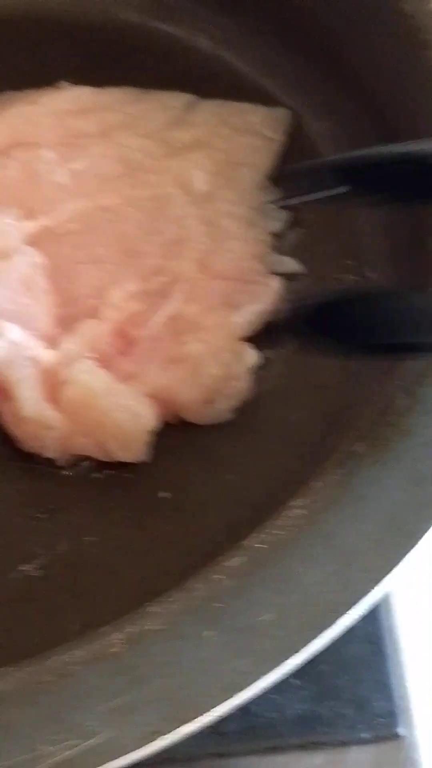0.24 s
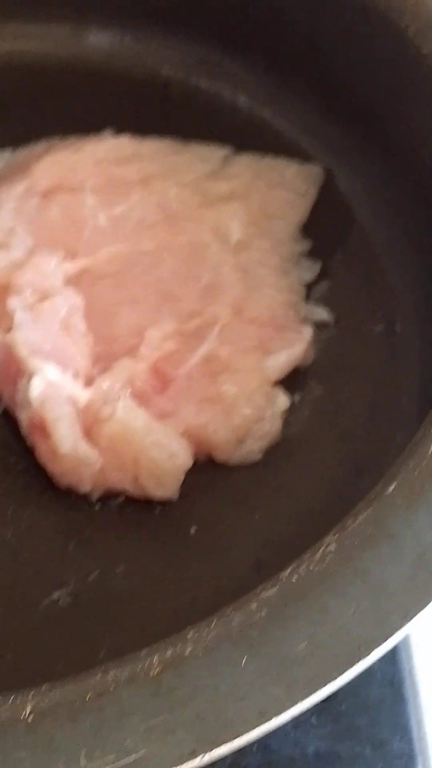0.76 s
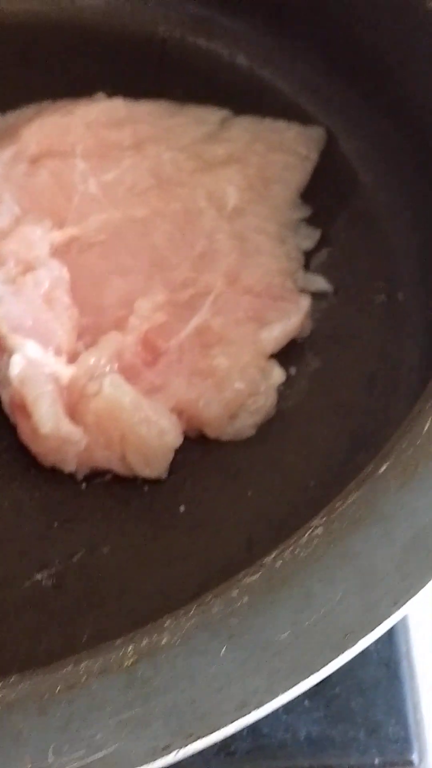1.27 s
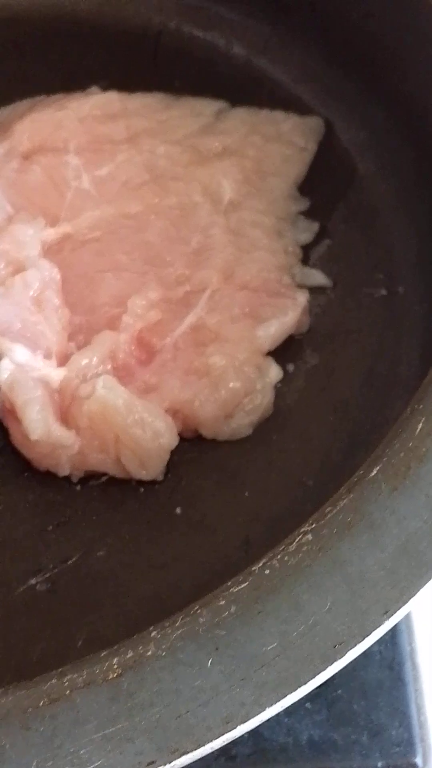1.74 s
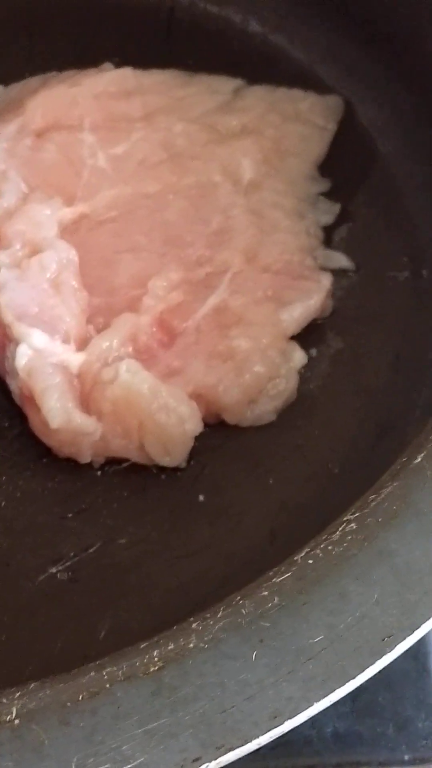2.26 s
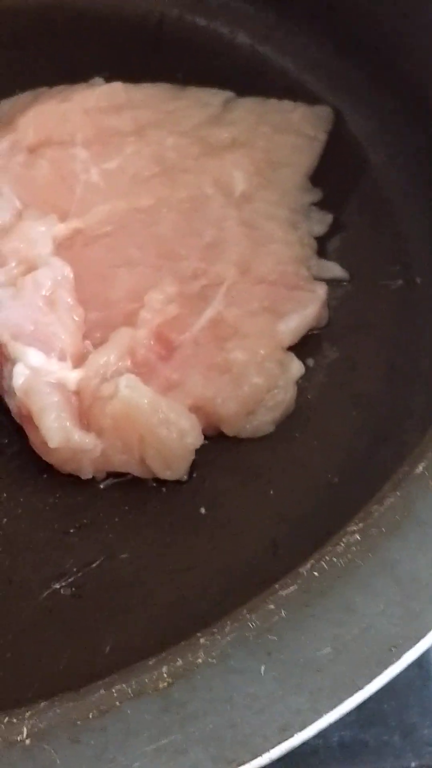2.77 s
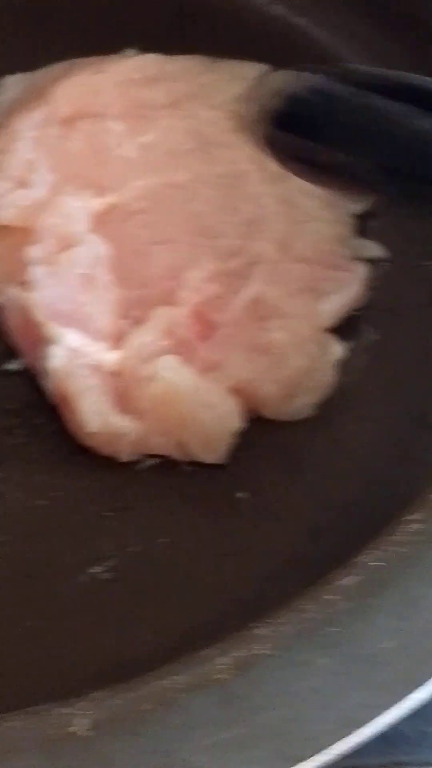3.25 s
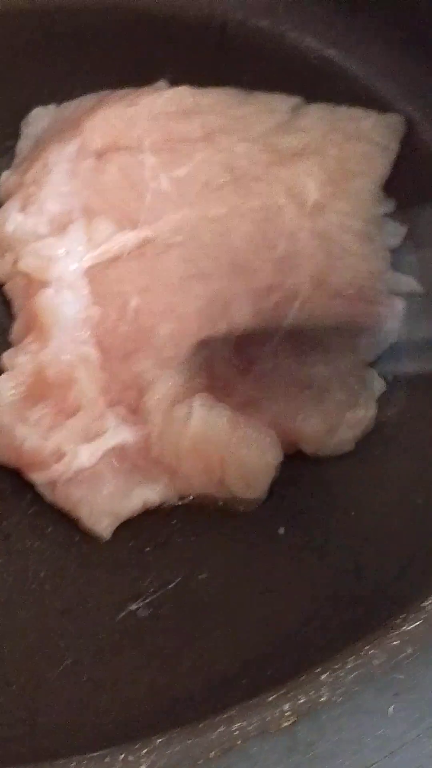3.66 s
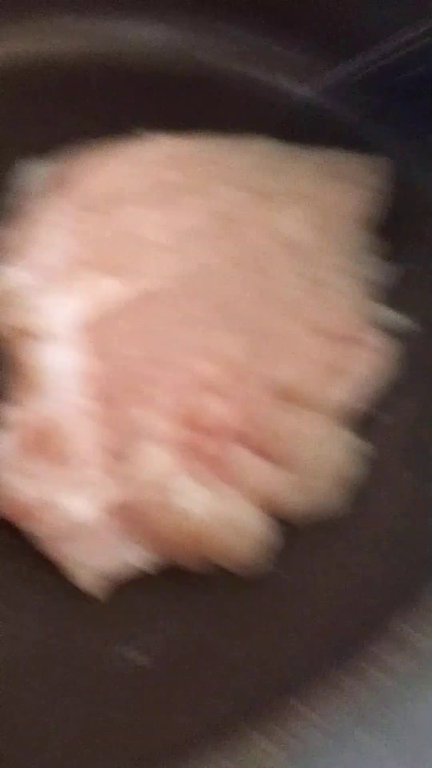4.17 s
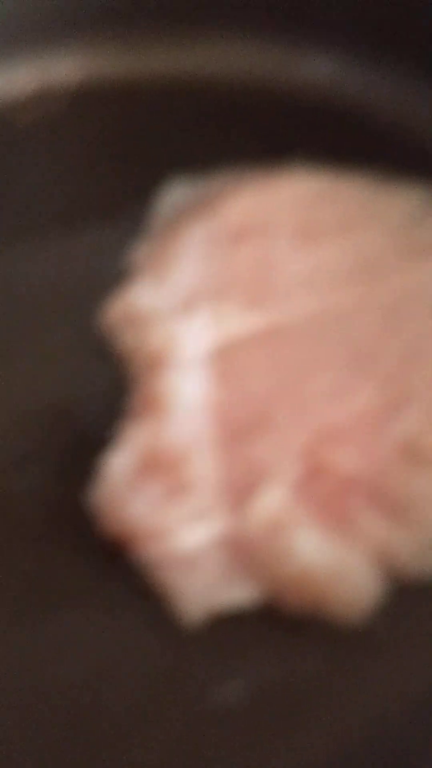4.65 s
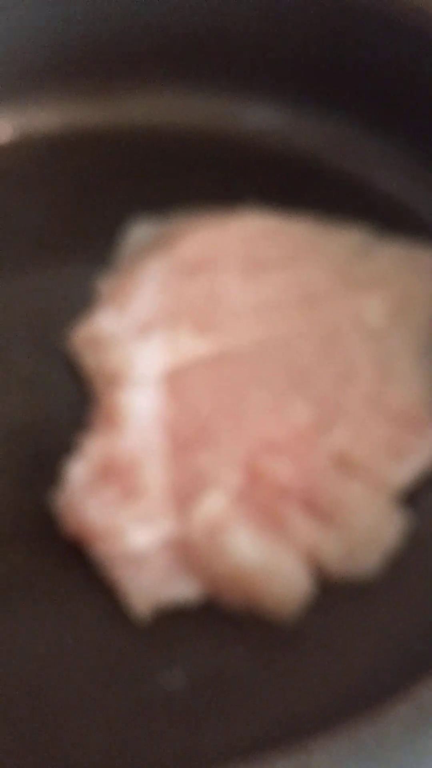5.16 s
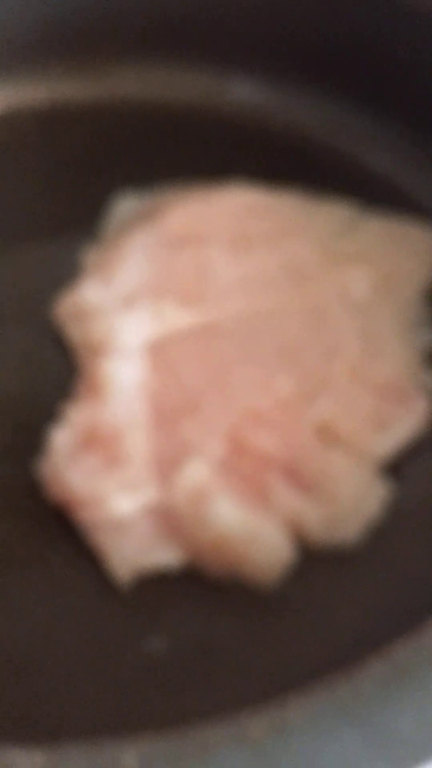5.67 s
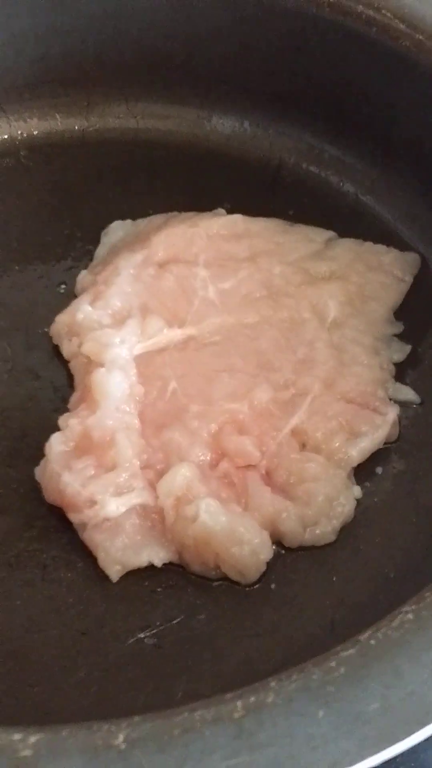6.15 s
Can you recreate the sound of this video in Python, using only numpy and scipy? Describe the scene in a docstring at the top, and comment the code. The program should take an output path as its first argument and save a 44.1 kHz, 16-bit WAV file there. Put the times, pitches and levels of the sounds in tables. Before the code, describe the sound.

Soft hissing sprays of oil come in two groups in a quiet kitchen, with one hard, ringing metal utensil clink between them.

```python
"""A quiet, humming kitchen. A chicken cutlet settles in a cold frying pan with tiny wet ticks.
Soft strokes of hiss, as from an oil mister, come in two groups: jet noise, droplets, moving air.
Handling adds a few light taps, and dull thuds that set the stove top ringing briefly.
Between the groups a metal utensil clinks once, hard, and its modes ring until it is held still.
Hard walls add a short tail."""
import sys
import numpy as np
from scipy import signal
from scipy.fft import rfft, irfft, next_fast_len
from scipy.io import wavfile
from scipy.ndimage import uniform_filter1d

SR = 44100
rng = np.random.default_rng(int(sys.argv[2]) if len(sys.argv) > 2 else 0)


def digitize_waveform(pressure):
    """Quantize a signal to 16-bit integers and store it at the path in sys.argv[1].

    Rows of a 2-D input are taken as channels; values are limited to [-1, 1].
    """
    field = np.atleast_2d(pressure).T
    bounded = np.clip(field, -1, 1)
    quanta = np.round(bounded * 32767).astype(np.int16)
    wavfile.write(sys.argv[1], SR, quanta)


N = 282681

# Room noise. Each row: frequency in Hz, relative density in dB.
ROOM_SPECTRUM = [(15, -57), (25, -24), (40, -10.5), (64, -2.5), (108, -1.5), (123, -8), (277, -7.5),
                 (384, -11.5), (463, -12.5), (624, -12.5), (1370, -17.5), (1700, -15.5), (4740, -35.5),
                 (7920, -31.5), (16000, -43.5)]
# Appliance hum. Each row: frequency in Hz, rms level in dB.
HUM_TONES = [(56.5, -74.5), (76, -75.5), (99.3, -74), (284, -77.5), (371, -81.5), (630, -89.5),
             (1744, -84.5)]
# Clearest ticks of the meat. Each row: start in seconds, relative level in dB.
CLEAR_TICKS = [(0.2384, -65), (2.0348, -63), (2.533, -60), (2.704, -62), (2.8694, -64.5), (3.305, -56.5),
               (3.331, -61), (4.0487, -61)]
# Light taps and scuffs. Each row: start in seconds, level in dB, t60 in seconds, pitch in Hz.
LIGHT_TAPS = [(0.4515, -44, 0.034, 2260), (0.452, -60, 0.37, 8800), (0.46, -49.5, 0.14, 1640),
              (.825, -48, 0.07, 8400), (.896, -47, 0.057, 2230), (1.464, -39, 0.041, 2340),
              (1.649, -44, 0.11, 8650), (2.36, -60, 0.03, 2430), (2.7669, -46, 0.028, 2860),
              (2.775, -65, 0.1, 8400), (4.695, -64, 0.087, 9000), (5.115, -43, 0.07, 2600),
              (6.335, -46.5, 0.1, 1520), (6.347, -45, 0.61, 2170), (6.35, -52.5, 0.78, 8700)]
# Spray strokes. Each row: time of full flow in seconds, hold in seconds, mist hiss in dB,
# nozzle rush in dB, fall in dB per second.
SPRAY_STROKES = [(0.571, 0.037, -54.5, -59.0, 155), (0.794, 0.05, -62.0, -63.5, 120),
                 (0.994, 0.19, -49.5, -50, 100), (1.235, 0.044, -46.5, -48.5, 90),
                 (1.495, 0.085, -44.5, -48, 240), (1.668, 0.067, -51, -54, 410),
                 (4.826, 0.059, -53.5, -56.5, 260), (4.98, 0.02, -53, -56, 250),
                 (5.064, 0.12, -51, -51, 62), (5.327, 0.034, -46.0, -48.5, 190),
                 (5.438, 0.02, -50.5, -49, 138), (5.716, 0.004, -79.5, -72.0, 32),
                 (6.118, 0.0033, -48, -48, 360), (6.173, 0.014, -58.5, -50, 197)]
# Mist hiss, nozzle rush, moving air. Each row: frequency in Hz, relative density in dB.
MIST_SPECTRUM = [(3000, -37), (4700, -11), (6200, -7.5), (7600, -1), (9800, 1), (11000, -3.5), (12200, -16),
                 (14500, -6), (16000, -13)]
RUSH_SPECTRUM = [(150, -47), (400, -23), (800, -18), (1100, -13.5), (1700, -9.5), (2150, -0.5), (2700, 0),
                 (3200, -3.5), (3700, -9.5), (4600, -19), (7000, -26)]
DRAUGHT_SPECTRUM = [(25, -16), (60, 6.5), (100, 3.5), (170, -4), (300, -2), (550, -8.5), (1200, -7),
                    (3000, -26)]
# Soft knocks on the stove top. Each row: start in seconds, drive level in dB, t60 in seconds.
KNOCKS = [(1.0873, -36.5, 0.14), (1.3453, -48.5, 0.24), (1.3837, -49, 0.12), (6.3365, -43.5, 0.11)]
# Stove top resonances. Each row: frequency in Hz, width in Hz, gain in dB.
STOVE_MODES = [(188, 130, -14), (273.5, 21, -6.5), (357, 49, -9), (506, 150, -10), (770, 480, -7),
               (990, 140, -5), (1240, 550, -7)]
# The utensil lands, bounces, chatters. Each row: start in seconds, level in dB, t60 in seconds.
UTENSIL_CONTACTS = [(3.0735, -32.5, 0.0083), (3.0745, -24.5, 0.012), (3.0812, -30, 0.026),
                    (3.088, -43.5, .22)]
# Crack of those contacts. Each row: frequency in Hz, relative density in dB.
CRACK_SPECTRUM = [(120, -43), (280, -15.5), (500, -11.5), (750, -14.5), (1300, -5.5), (2300, 4.5),
                  (3200, -6.5), (5000, -12.5), (7500, -3.5), (10000, -7), (12000, -26.5), (16000, -26.5)]
# Utensil modes; close pairs beat. Each row: frequency in Hz, level in dB, t60 in seconds.
UTENSIL_MODES = [(281, -53.5, 0.21), (349, -54, .2), (440.7, -42.5, 0.25), (607, -46, 0.18),
                 (840, -49.5, .12), (1323, -44.5, 0.14), (1336, -27.5, 0.075), (1857, -44.5, .6),
                 (1956, -30, 0.081), (1997, -50.5, 1.1), (2015, -54, 1.2), (2044, -25.5, .06),
                 (2040, -35.5, 0.1), (2230, -20, 0.053), (2190, -46, 0.96), (2440, -54.5, .8),
                 (2530, -35.5, 0.1), (2662, -15.5, 0.088), (2656, -41, 0.17), (2780, -39, .12),
                 (3190, -58.5, .6), (3565, -39, 0.1486), (3540, -49.5, 0.38), (3700, -50.5, 0.25),
                 (4180, -42, .21), (4581, -58, .27), (5270, -60, 0.55), (5362, -48.5, 0.18),
                 (6400, -52, .17), (7600, -50.5, 0.27), (8490, -46, 0.12), (9830, -50.5, .18)]

CLINK_S, HELD_S = 3.0732, 3.49
TIME_S = np.arange(N) / SR


def from_db(db):
    """Decibels to gain."""
    return 10 ** (np.asarray(db) / 20)


def coloured(x, spectrum):
    """Minimum-phase filter with the given spectrum; white noise keeps its power."""
    size = 2 * next_fast_len(N // 2 + SR // 4)
    hz, db = np.transpose(spectrum)
    bins_hz = np.arange(size // 2 + 1) * SR / size
    gain = from_db(np.interp(np.log(bins_hz + 1), np.log(hz), db))
    cepstrum = irfft(np.log(gain / np.sqrt(np.mean(gain ** 2))))
    cepstrum[1:size // 2] *= 2  # fold onto positive time: causal
    cepstrum[size // 2 + 1:] = 0
    return irfft(rfft(x, size) * np.exp(rfft(cepstrum)))[:N]


def noise(spectrum):
    """Coloured noise, rms 1."""
    return coloured(rng.standard_normal(N), spectrum)


def drift(rate_hz):
    """Slow random wander, spread near 1."""
    return np.interp(TIME_S * rate_hz, np.arange(N), rng.standard_normal(N))


def decay(start_s, t60_s):
    """Envelope that jumps to 1 and dies away."""
    age_s = TIME_S - start_s
    return (age_s >= 0) * from_db(-60 * np.clip(age_s / t60_s, 0, 4))


def bursts(contacts):
    """One dying noise burst per contact."""
    envelope = sum(from_db(db) * decay(start_s, t60_s) for start_s, db, t60_s in contacts)
    return envelope * rng.standard_normal(N)


def resonate(x, hz, width_hz):
    """One resonance; white noise keeps its power."""
    radius = np.exp(-np.pi * width_hz / SR)
    feedforward = np.sqrt((1 - radius ** 2) / 2) * np.array([1, 0, -1])
    feedback = [1, -2 * radius * np.cos(2 * np.pi * hz / SR), radius ** 2]
    return signal.lfilter(feedforward, feedback, x)


def background(room_db=-65, waver_rad=0.4, whine_db=-89):
    """Steady room noise, a slightly unsteady appliance hum, a faint thin whine."""
    hum = 0
    for hz, db in HUM_TONES:
        phase_rad = 2 * np.pi * hz * TIME_S + waver_rad * drift(rate_hz=5.5)
        hum += from_db(db) * np.sqrt(2) * np.sin(phase_rad)
    whine = from_db(whine_db) * resonate(rng.standard_normal(N), hz=6300, width_hz=160)
    return from_db(room_db) * noise(ROOM_SPECTRUM) + hum + whine


def wet_ticks(ticks_per_s=16, tiny_max_db=-71, spread_db=6, clear_gain_db=-7, t60_s=0.033):
    """Moist meat settles on the pan: many tiny random ticks, a few clear ones."""
    onsets = rng.random(N) < ticks_per_s / SR
    impulses = onsets * from_db(tiny_max_db - rng.exponential(spread_db, N))
    for start_s, db in CLEAR_TICKS:
        impulses[int(start_s * SR)] += from_db(db + clear_gain_db)
    pole = from_db(-60 / (t60_s * SR))
    envelope = signal.lfilter([1], [1, -pole], impulses + 1e-18)
    return resonate(envelope * rng.standard_normal(N), hz=9000, width_hz=3000)


def taps(width_ratio=0.3, cutoff_ratio=1.92):
    """Each touch excites one broad, damped resonance; the soft contact dulls what lies above."""
    out = 0
    for start_s, db, t60_s, hz in LIGHT_TAPS:
        tap = resonate(bursts([(start_s, db, t60_s)]), hz, width_ratio * hz)
        lowpass = signal.butter(2, min(cutoff_ratio * hz, 0.45 * SR), fs=SR, output="sos")
        out += signal.sosfilt(lowpass, tap)
    return out


def stroke(full_flow_s, hold_s, fall_db_per_s, swell_s=0.053):
    """Gain of one squeeze: swells to full flow, holds, dies as the pressure drops."""
    age_s = TIME_S - full_flow_s
    swell = np.exp(-(np.minimum(age_s, 0) / swell_s) ** 2)
    return swell * from_db(-fall_db_per_s * np.maximum(age_s - hold_s, 0))


def droplets(drops_per_s=500, spread_db=8.5):
    """Droplet patter: impulses of random size and sign, rms 1."""
    onsets = rng.random(N) < drops_per_s / SR
    impulses = onsets * from_db(spread_db * np.minimum(rng.exponential(1, N), 4))
    return impulses * rng.choice([-1, 1], N) / np.std(impulses)


def spray(drops_db=-10, rush_gain_db=0.03, draught_gain_db=-7, flutter_db=1.36, waver_db=0.48):
    """The jet hisses, droplets patter in it, moving air rumbles. Strokes add in power."""
    power = 0
    for full_flow_s, hold_s, mist_db, rush_db, fall_db_per_s in SPRAY_STROKES:
        flow = stroke(full_flow_s, hold_s, fall_db_per_s)
        power += np.outer(from_db([mist_db, rush_db]), flow) ** 2
    mist_envelope, rush_envelope = np.sqrt(power)
    patter = from_db(drops_db) * droplets()
    mist = mist_envelope * coloured(rng.standard_normal(N) + patter, MIST_SPECTRUM)
    rush = from_db(rush_gain_db) * rush_envelope * noise(RUSH_SPECTRUM)
    draught_envelope = uniform_filter1d(rush_envelope, size=SR // 4)
    draught = from_db(draught_gain_db) * draught_envelope * noise(DRAUGHT_SPECTRUM)
    flicker = from_db(flutter_db * drift(rate_hz=70) + waver_db * drift(rate_hz=20))
    return (mist + rush) * flicker + draught


def thuds():
    """Soft knocks ring the stove top briefly; its modes alternate in sign."""
    force = bursts(KNOCKS)
    return sum((-1) ** k * from_db(db) * resonate(force, hz, width_hz)
               for k, (hz, width_hz, db) in enumerate(STOVE_MODES))


def clink(build_s=0.0012, held_t60_s=0.19):
    """Hard contacts crack, then the utensil rings until a touch damps it."""
    age_s = np.maximum(TIME_S - CLINK_S, 0)
    ring = sum(from_db(db) * decay(CLINK_S, t60_s) * np.sin(2 * np.pi * hz * age_s)
               for hz, db, t60_s in UTENSIL_MODES)
    build = 1 - np.exp(-(age_s / build_s) ** 2)  # ringing grows over the first contacts
    damping = np.where(TIME_S < HELD_S, 1, decay(HELD_S, held_t60_s))
    crack = coloured(bursts(UTENSIL_CONTACTS), CRACK_SPECTRUM)
    return ring * build * damping + crack


def shimmer(count=40, low_hz=6500, high_hz=15500, low_db=-59, tilt_db=-20, spread_db=3, t60_s=0.19):
    """The utensil's many faint high overtones, weaker toward the top."""
    age_s = np.maximum(TIME_S - CLINK_S, 0)
    band_fractions = rng.random(count)
    modes_hz = low_hz + band_fractions * (high_hz - low_hz)
    levels_db = low_db + tilt_db * band_fractions + spread_db * rng.standard_normal(count)
    tones = sum(from_db(db) * np.sin(2 * np.pi * hz * age_s) for hz, db in zip(modes_hz, levels_db))
    return tones * decay(CLINK_S, t60_s)


def kitchen_reverb(x, wet_db=-11, t60_s=0.3, first_echo_s=0.012):
    """Hard walls add a short, dense tail."""
    tail = rng.standard_normal(N) * decay(first_echo_s, t60_s)
    echoes = signal.fftconvolve(x, tail[:SR] / np.linalg.norm(tail))[:N]
    return x + from_db(wet_db) * echoes


def scene():
    """Sources at the stove sound into the room, over the background. Mono."""
    at_stove = spray() + clink() + shimmer() + taps() + thuds() + wet_ticks()
    return (kitchen_reverb(at_stove) + background())[None]


def record(dry):
    """Steep elliptic low-pass."""
    lowpass = signal.ellip(10, rp=0.2, rs=70, Wn=15900, fs=SR, output="sos")
    return signal.sosfilt(lowpass, dry)


dry = scene()
out = record(dry)
digitize_waveform(out)
```